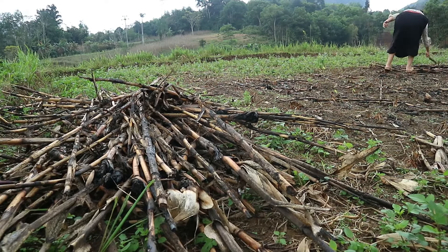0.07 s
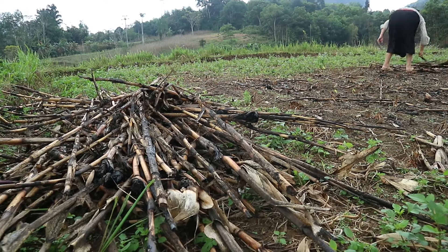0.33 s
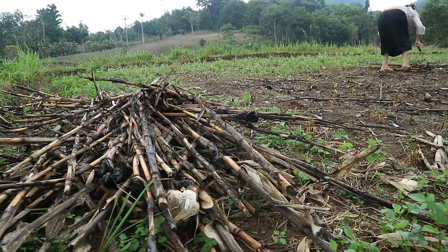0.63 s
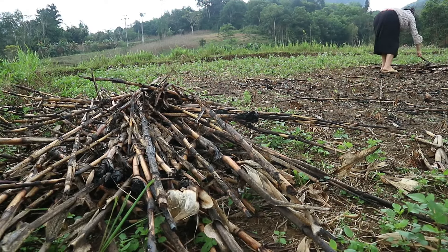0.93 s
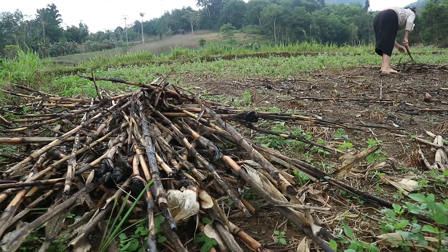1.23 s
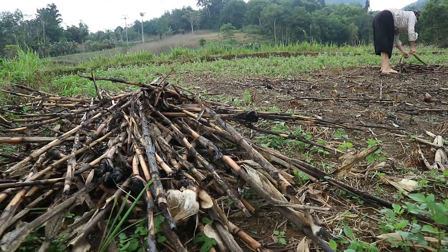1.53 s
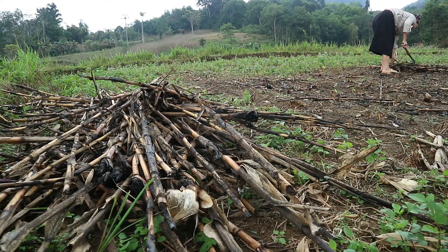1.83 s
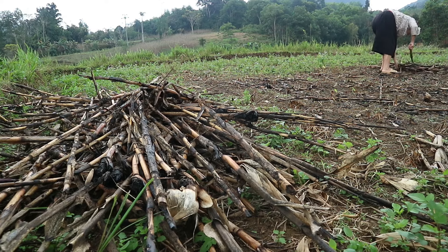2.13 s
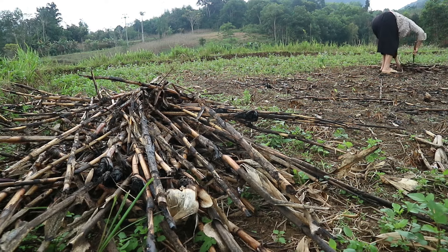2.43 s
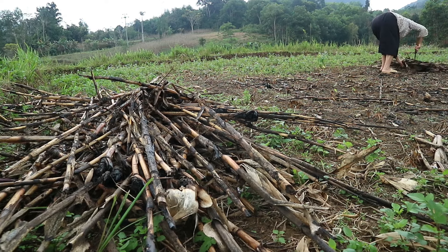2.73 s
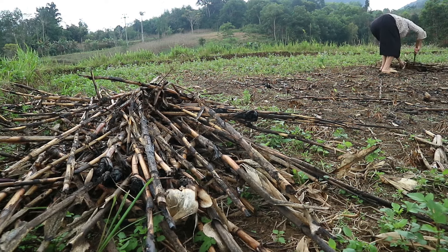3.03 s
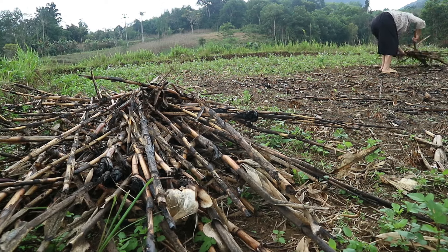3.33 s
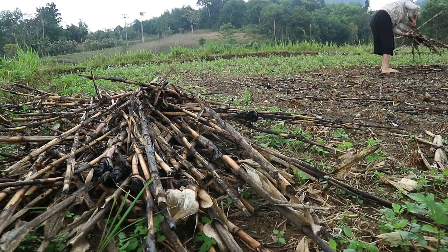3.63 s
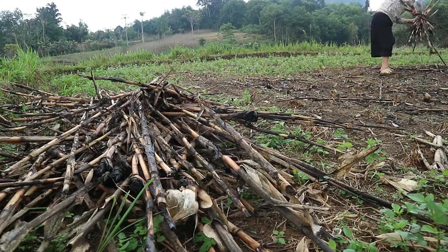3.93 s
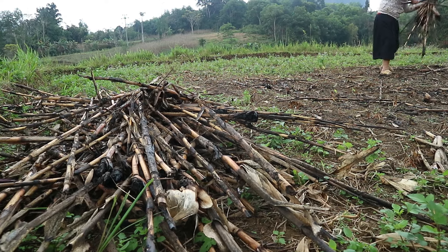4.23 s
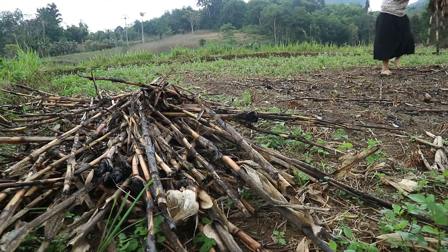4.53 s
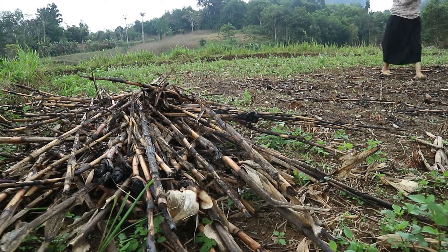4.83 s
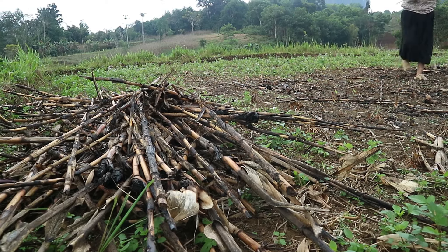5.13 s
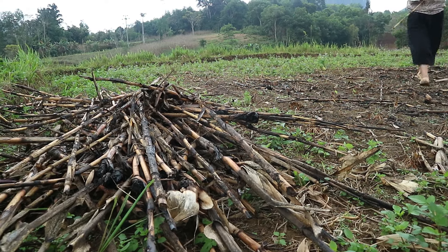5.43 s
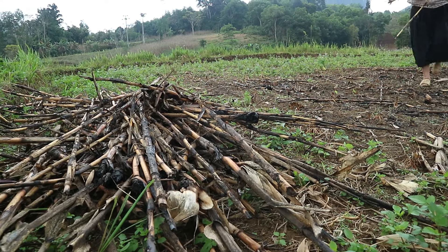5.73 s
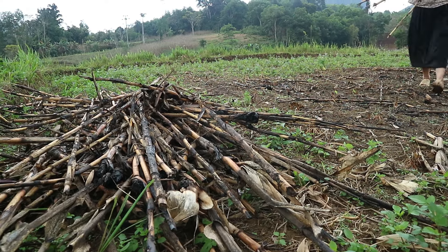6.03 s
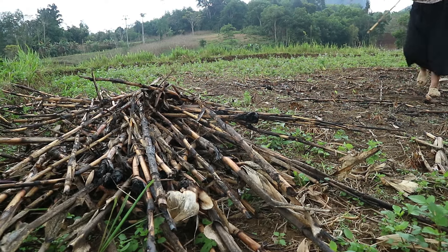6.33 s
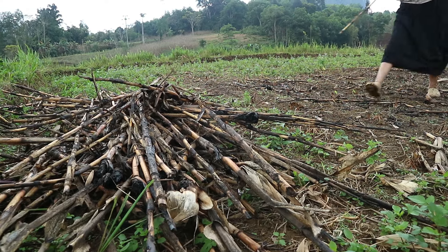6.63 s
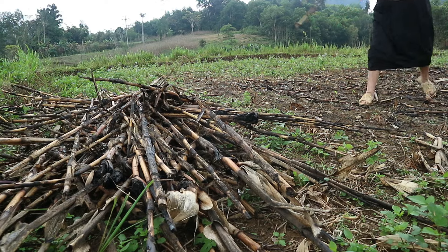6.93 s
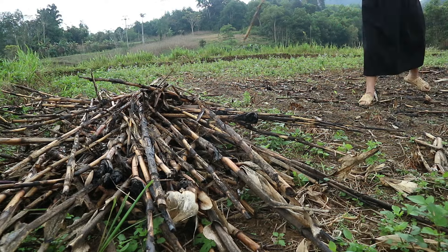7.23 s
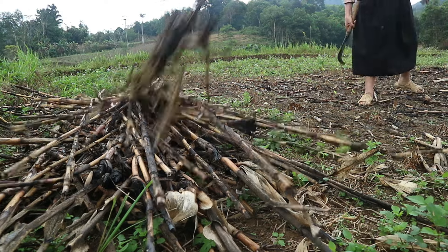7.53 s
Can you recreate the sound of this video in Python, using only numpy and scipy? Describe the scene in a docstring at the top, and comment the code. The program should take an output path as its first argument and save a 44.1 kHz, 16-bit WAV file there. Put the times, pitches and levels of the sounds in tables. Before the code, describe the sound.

In an open field, dry sticks are scraped together over soil a little way off, with soft rustles, small snaps and dull knocks. After a lull, footsteps crackle across stubble and a cane splits underfoot. At the end the armful lands on a pile close to the microphone with a loud, brief wooden clatter. A distant bird repeats two falling notes throughout, over a low outdoor hush and a very faint insect whine.

```python
"""Over an open-air hush, stirring grass and an insect's thin tone, dry sticks scrape across a bare field.
They are raked together, carried over crackling stubble where a cane splits underfoot, and thrown on a
pile close by. Each impact excites a short crack, the bending modes of one stick and a dull knock from
what lies under it. Far off a bird repeats two falling notes, blurred by scattering among trees."""
import sys
import numpy as np
from scipy import signal
from scipy.fft import rfft, irfft, next_fast_len
from scipy.io import wavfile
from scipy.ndimage import uniform_filter1d

SR = 44100
rng = np.random.default_rng(int(sys.argv[2]) if len(sys.argv) > 2 else 0)


def store_pcm(level_fs):
    """Save levels as 16-bit WAV."""
    pcm = np.round(np.clip(level_fs, -1, 1) * 32767).astype(np.int16)
    wavfile.write(sys.argv[1], SR, np.atleast_2d(pcm).T)


N = 342657
TIME = np.arange(N) / SR
SIDES = np.array([[1], [-1]])  # sign of the side signal, left and right
TOP_HZ = 15900

# Spectra (levels are relative throughout). Open-air hush: f/Hz, level/dB
HUSH_SPECTRUM = [(25, -8), (48, 0.5), (75, 1), (145, 3), (200, -4.5), (420, -8), (540, -15), (800, -19),
                 (1300, -25.5), (3700, -29.5), (5000, -32), (10000, -37.5), (12000, -55.5)]
# side relative to mid in the hush: f/Hz, level/dB
HUSH_WIDTH = [(130, -14), (200, 0), (1300, 9), (3000, 3.5), (10000, 6.5)]
# rustling husks: f/Hz, level/dB
HUSK_SPECTRUM = [(600, -23), (1900, 13), (3700, 10.5), (6800, 7), (10000, -5), (12500, -70)]
# scuffed soil: f/Hz, level/dB
SOIL_SPECTRUM = [(70, -4.5), (240, 6.5), (540, 1), (670, -4.5), (860, 2), (1080, -18), (1270, -0.5),
                 (1500, -22), (1900, -6), (3600, -27), (9000, -20.5), (15500, -66)]
# cracking wood: f/Hz, level/dB
CRACK_SPECTRUM = [(200, -2.5), (550, 11), (850, 7), (1100, -2.5), (1800, 7.5), (2350, 4), (3900, 2),
                  (4900, -2.5), (6800, -1), (10000, -12), (15500, -35)]
# knock of what lies under a stick: f/Hz, level/dB
KNOCK_SPECTRUM = [(60, -20), (130, -3.5), (220, 2.5), (350, 4.5), (440, -13.5), (540, -2), (660, -18.5),
                  (860, -2.5), (1150, -28), (2500, -57)]
# treble absorption by the air over the distance: f/Hz, gain/dB
DISTANCE_FILTER = [(9000, -1), (14000, -14)]
# colouring of a crack under the sole: f/Hz, gain/dB
SOLE_FILTER = [(140, 6.5), (280, 0.5), (550, 4.5), (950, -1), (6500, -2)]
# radiation of a thin cane, weak in the bass: f/Hz, gain/dB
CANE_FILTER = [(700, -5.5), (1900, 2), (7000, -1), (13000, 2)]
# tearing cane fibres: f/Hz, level/dB
FIBRE_SPECTRUM = [(500, -2), (1000, 3), (1350, -1), (2000, 11), (2450, -12), (3200, 10), (4500, -9),
                  (8000, -7), (14000, -23)]
# left minus right in the direct sound of the work with the sticks: f/Hz, level/dB
STEREO_BALANCE = [(200, 0), (700, 3), (1300, 13), (1900, -3.5), (4400, -0.5)]

# sweeps that rake, lift, carry and swing the sticks: peak t/s, rise width/s, husk level/dB, soil level/dB
STICK_SWEEPS = [(.01, 0.011, -58, -48), (.505, 0.076, -58.5, -51.5), (1.18, 0.08, -60, -50),
                (1.739, 0.038, -57.5, -51), (2.17, 0.036, -70.5, -60.5), (2.8, 0.11, -66.5, -72),
                (3.48, 0.097, -66, -64.5), (5.045, 0.034, -61.5, -56.5), (5.99, 0.061, -68, -72),
                (6.205, 0.0092, -57.5, -62), (7.17, 0.14, -62, -63)]
# single twigs snapping: t/s, crack level/dB, ring f/Hz
TWIG_SNAPS = [(0.086, -47, 8500), (0.358, -49.5, 5400), (1.059, -46.5, 3420), (1.113, -43, 3860),
              (1.810, -46, 3770), (2.402, -53.5, 3460), (2.648, -55, 1870), (3.322, -50.5, 5800),
              (3.421, -57, 5400), (5.115, -48.5, 3880), (5.247, -49, 2260), (5.951, -59, 7200),
              (6.038, -57.5, 4100), (6.105, -55, 2960), (7.268, -53.5, 4400)]
# heavier sticks striking the ground: t/s, crack level/dB, knock level/dB, ring f/Hz
GROUND_KNOCKS = [(.481, -44, -38.5, 905), (.528, -46.5, -40, 890), (.596, -54, -36.5, 810),
                 (.735, -53, -44.5, 930), (1.143, -48.5, -34, 524), (1.217, -45, -34.5, 620),
                 (1.329, -48, -42.5, 1160), (1.612, -53, -39.5, 880), (1.683, -51, -42, 1800),
                 (2.229, -52, -48, 600), (4.3465, -51, -41, 1930)]
# feet pressing hollow stalks: t/s, crack level/dB, knock level/dB, ring f/Hz
FOOTSTEPS = [(5.0429, -37, -34, 3200), (5.0694, -66, -48, 900), (5.709, -43.5, -40, 750),
             (6.329, -46.5, -37.5, 1310), (6.426, -39, -32, 336), (6.431, -35, -37, 520),
             (6.4544, -40.5, -36, 2000), (6.648, -45.5, -47, 1960), (6.687, -50.5, -50.5, 855)]
# the bird's pairs of notes: t/s, level/dB
CALLS = [(0.23, -52.5), (0.901, -52.5), (1.589, -52.5), (2.266, -52.5), (2.921, -52.5), (3.605, -55.5),
         (4.281, -57), (4.95, -56.5), (5.63, -54), (6.306, -52.5), (7.003, -52)]
# glide of the lower note: t/s from its onset, f/Hz, level/dB
LOW_NOTE = [(0, 3450, -9), (.009, 3250, 3.5), (.022, 3020, 3), (.045, 2800, -4), (.085, 2280, -9)]
# glide of the higher note: t/s from its onset, f/Hz, level/dB
HIGH_NOTE = [(0, 4298, -7), (.011, 4060, 4), (.028, 3580, -1), (.042, 3150, 3.5), (.058, 2890, -4.5),
             (.09, 2600, -7)]
# jerks of the splitting cane: t/s, crack level/dB
CANE_SPLITS = [(6.8149, -40), (6.834, -41), (6.852, -32.5)]
# the armful landing: t/s, crack level/dB, knock level/dB, ring f/Hz, crack T60/s
PILE_IMPACTS = [(7.5194, -42, -39, 1420, 0.11), (7.545, -48, -39, 1810, 0.04),
                (7.561, -54, -25.5, 343, 0.024), (7.5663, -32.5, -30, 5500, 0.031),
                (7.603, -41, -48, 2060, 0.032), (7.611, -35, -39, 900, 0.048),
                (7.6217, -27, -44, 1380, 0.016), (7.628, -25.5, -20.5, 1860, 0.06),
                (7.638, -36, -26, 850, 0.02), (7.654, -22.5, -23.5, 1400, 0.055),
                (7.671, -29.5, -27, 910, 0.023), (7.697, -33, -28, 1950, 0.04),
                (7.7035, -27, -24, 1580, 0.027), (7.711, -27.5, -24.5, 860, 0.11),
                (7.7225, -15.5, -43, 4180, 0.015), (7.727, -26, -29, 2720, 0.013),
                (7.731, -19, -36, 1720, 0.011), (7.744, -48, -22.5, 1770, 0.034)]


def undb(db):
    """Amplitude ratio of a level in decibels."""
    return 10 ** (np.asarray(db) / 20)


def unit(x):
    """Normalisation to rms 1."""
    return x / np.sqrt(np.mean(x ** 2))


def gains(spectrum, size):
    """Interpolation of a spectrum over log frequency, as gains on the bins of a transform."""
    hz, db = np.transpose(spectrum)
    return undb(np.interp(np.log(np.arange(size // 2 + 1) * SR / size + 1), np.log(hz), db))


def tint(x, spectrum):
    """Zero-phase filtering: colour without delay."""
    size = next_fast_len(N)
    return irfft(rfft(x, size) * gains(spectrum, size), size)[..., :N]


def resound(x, spectrum, size=2048):
    """Convolution with the minimum-phase, unit-energy impulse response of a body."""
    cepstrum = irfft(np.log(gains(spectrum, size)))
    cepstrum[1:size // 2] *= 2
    cepstrum[size // 2 + 1:] = 0
    response = irfft(np.exp(rfft(cepstrum)))
    return signal.oaconvolve(x, response / np.linalg.norm(response))[:N]


def fade(t, t60):
    """Exponential damping by 60 dB in t60 seconds."""
    return np.exp(-np.log(1000) * t / t60)


def add(track, start_s, sound):
    """Superposition of a sound on a track."""
    part = track[max(int(start_s * SR), 0):][:len(sound)]
    part += sound[:len(part)]


def wander(rate_hz):
    """Random modulation of rms 1, interpolated between Gaussian values."""
    knots = rng.standard_normal(2048)
    return unit(np.interp(TIME * rate_hz, np.arange(len(knots)), knots))


def air(db, flutter_db):
    """Partially coherent noise: the bass of the hush is alike on both sides, the rest is wide."""
    mid, side = tint(rng.standard_normal((2, N)), HUSH_SPECTRUM)
    hush = (mid + SIDES * tint(side, HUSH_WIDTH)) / np.std(mid)
    return hush * undb(db + flutter_db * wander(6.6))


def grass(db):
    """Modulated band noise: dry grass rustles in brief fits, independent from band to band."""
    rustle = np.zeros((2, N))
    for hz in np.geomspace(500, 4200, 12):
        band = signal.butter(2, [hz / 1.12, hz * 1.12], "bandpass", fs=SR, output="sos")
        fits = unit(undb(4.2 * wander(32)))
        rustle += unit(signal.sosfilt(band, rng.standard_normal((2, N)))) * fits / hz ** .3
    return undb(db) * unit(rustle)


def insect(hz, db):
    """Multipath interference spreads a distant, wavering whine into a narrow band."""
    carrier = np.exp(2j * np.pi * np.cumsum(hz + 11 * wander(40)) / SR)
    paths = np.array([1 + undb(-6) * (wander(160) + 1j * wander(160)) for _ in range(2)])
    return undb(db) * unit(np.real(carrier * paths))


def twigs(per_s, spread_db, lo_hz, hi_hz, ring_cycles, count=40):
    """Modal resonance of many small sticks: each Poisson-timed touch rings up to three modes; rms 1."""
    gaps, sizes, signs, *picks = rng.random((24000, 6)).T
    onsets = (np.cumsum(-np.log(1 - gaps)) / per_s * SR).astype(int)
    force = undb(spread_db * np.minimum(-np.log(1 - sizes), 3.5)) * np.sign(signs - .5)
    picked_modes = (np.array(picks) * count).astype(int)
    modes_hz = np.geomspace(lo_hz, hi_hz, count) * (1 + 0.052 * rng.standard_normal(count))
    ringing = np.zeros(N)
    for k, hz in enumerate(modes_hz):
        touched = (onsets < N) & np.any(picked_modes == k, axis=0)
        drive = np.bincount(onsets[touched], force[touched], N) + 1e-18
        radius = fade(1 / SR, ring_cycles / hz)
        feedback = [1, -2 * radius * np.cos(2 * np.pi * hz / SR), radius ** 2]
        ringing += signal.lfilter([1, 0, -1], feedback, drive) * np.sqrt((1 - radius) * hz)
    return unit(ringing)


def grains(per_s, spread_db):
    """Shot noise: tiny random contacts of very uneven size; rms 1."""
    sizes = undb(spread_db * np.minimum(rng.exponential(size=N), 4))
    return unit((rng.random(N) < per_s / SR) * sizes * rng.choice([-1, 1], N))


def swell(peak_s, rise_s, fall_ratio=1.19, roundness=1.22):
    """Amplitude envelope of one sweep, which falls a little more slowly than it rises."""
    width = np.where(TIME < peak_s, rise_s, rise_s * fall_ratio)
    return np.exp(-(np.abs(TIME - peak_s) / width) ** roundness / 2)


def raking():
    """Friction as many small impacts: dragged sticks rustle the husks and scuff the soil in fits."""
    fits = unit(undb(3 * wander(90)))
    sweeps = np.array([swell(peak_s, rise_s) for peak_s, rise_s, _, _ in STICK_SWEEPS])
    stir, drag = undb(np.array(STICK_SWEEPS)[:, 2:]).T @ sweeps
    husks = twigs(per_s=1300, spread_db=2.6, lo_hz=790, hi_hz=10800, ring_cycles=36)
    clods = grains(per_s=550, spread_db=2.7)
    crackle = unit(resound(husks, HUSK_SPECTRUM)) * stir
    scuffs = resound(clods, SOIL_SPECTRUM) * drag
    return (crackle + scuffs) * fits


def impacts(rows, ring_db, ring_cycles, knock_t60, give_s, size=4096):
    """Impact excitation: a stick yields, cracks, rings in its bending modes and knocks what lies below."""
    t = (np.arange(size) - 256) / SR
    after = np.maximum(t, 0)
    give = np.exp(np.minimum(t, 0) / give_s) * np.where(t < 0, .4, 1)  # fibres crunch before they break
    ratios = (np.array([[3], [5], [7]]) / 3) ** 2  # bending modes of a free bar
    span = np.sqrt(.002 * SR)  # energy of 2 ms at rms 1
    cracks, rings, knocks = np.zeros((3, N))
    for s, crack_db, knock_db, hz, t60 in rows:
        splinters, grind = rng.standard_normal((2, size))
        crack = splinters * give * fade(after, t60)
        knock = grind * give * fade(after, knock_t60)
        knock = knock / np.linalg.norm(knock) + (t == 0)
        modes_hz = hz * ratios
        modes = np.sin(2 * np.pi * modes_hz * after) * fade(after, ring_cycles / modes_hz) / ratios
        ring = np.sum(modes * (modes_hz < 10700), axis=0)  # wood damps higher modes at once
        parts = (cracks, crack, crack_db), (rings, ring, crack_db + ring_db), (knocks, knock, knock_db)
        for track, sound, db in parts:
            add(track, s + t[0], span * undb(db) * sound / np.linalg.norm(sound))
    return resound(cracks, CRACK_SPECTRUM) + rings + resound(knocks, KNOCK_SPECTRUM)


def crack_t60(ring_hz):
    """Power-law scaling of decay time: thinner sticks ring higher and crack more briefly."""
    return 0.034 * (2000 / ring_hz) ** 0.066


def stubble():
    """Absorption by the air over the distance dulls snapping twigs, knocking sticks and hollow stalks pressed
    underfoot."""
    snap_rows = [(s, db, db - 18, hz, crack_t60(hz)) for s, db, hz in TWIG_SNAPS]  # light: little knock
    knock_rows = [(*row, crack_t60(row[-1])) for row in GROUND_KNOCKS]
    step_rows = [(*row, crack_t60(row[-1])) for row in FOOTSTEPS]
    steps = impacts(step_rows, ring_db=-2, ring_cycles=18, knock_t60=0.024, give_s=0.002)
    snaps = impacts(snap_rows, ring_db=1.5, ring_cycles=17, knock_t60=0.023, give_s=0.0038)
    knocks = impacts(knock_rows, ring_db=-0.5, ring_cycles=26, knock_t60=0.083, give_s=0.0047)
    return tint(snaps + knocks + tint(steps, SOLE_FILTER), DISTANCE_FILTER)


def whistle(glide):
    """Frequency modulation: one falling pure tone, slightly detuned at random."""
    s, hz, db = np.transpose(glide)
    t = np.arange(int(s[-1] * SR)) / SR
    pitch = np.interp(t, s, hz) * (1 + 0.0089 * rng.standard_normal())
    return np.sin(2 * np.pi * np.cumsum(pitch) / SR) * undb(np.interp(t, s, db))


def bird(high_after_s=.215):
    """Scattering by trees at the field's edge blurs two alternating notes that waver on their way."""
    song = np.zeros(N)
    for s, db in CALLS:
        add(song, s, undb(db) * whistle(LOW_NOTE))
        add(song, s + high_after_s, undb(db) * whistle(HIGH_NOTE))
    song *= unit(undb(1.7 * wander(140)))
    trees = np.array([scatter(song, t60=.07) + undb(-4) * scatter(song, t60=.3) for _ in range(2)])
    return undb(-8.5) * song + undb(-5.8) * trees


def cane(ring_hz=2060, jerk_t60=0.019, tear_s=0.062):
    """Stepwise fracture: a cane splits underfoot in jerks, and its fibres keep tearing between them."""
    rows = [(s, db, db - 5, ring_hz, jerk_t60) for s, db in CANE_SPLITS]
    jerks = impacts(rows, ring_db=-5, ring_cycles=28, knock_t60=0.022, give_s=0.0023)
    progress = np.clip((TIME - CANE_SPLITS[0][0]) / tear_s, 0, 1)
    pressure = np.sqrt(4 * progress * (1 - progress))
    tearing = resound(grains(per_s=810, spread_db=3), FIBRE_SPECTRUM)
    return tint(jerks, CANE_FILTER) + undb(-47) * pressure * tearing


def settling(start_s=7.563, attack_s=0.067, hold_s=0.093, rise_db_per_s=202, fall_db_per_s=170):
    """Envelope of the pile's rattle: exponential growth, a plateau and exponential decay."""
    t = TIME - start_s
    rise = rise_db_per_s * np.minimum(t - attack_s, 0)
    fall = fall_db_per_s * np.maximum(t - attack_s - hold_s, 0)
    return undb(rise - fall) * (t > 0)


def landing():
    """Inelastic collisions: thick sticks strike the pile in turn, thin ones crunch and the heap thuds."""
    thin_sticks = twigs(per_s=1100, spread_db=3, lo_hz=480, hi_hz=9500, ring_cycles=50)
    clatter = undb(-7.5) * unit(resound(thin_sticks, CRACK_SPECTRUM))
    fractures = grains(per_s=2600, spread_db=3.5)
    splinters = undb(-10) * resound(fractures, [(1000, 13), (5500, 1), (15000, -5)])
    heap = undb(-9.5) * resound(grains(per_s=1400, spread_db=1), KNOCK_SPECTRUM)
    blows = impacts(PILE_IMPACTS, ring_db=-6, ring_cycles=24, knock_t60=0.024, give_s=0.002)
    return undb(-30.5) * settling() * (clatter + splinters + heap) + blows


def scatter(x, t60, size=16384):
    """Diffuse reflection smears a sound in time and keeps its colour."""
    tail = rfft(rng.standard_normal(size) * fade(np.arange(size) / SR, t60))
    whitened = tail / np.sqrt(uniform_filter1d(np.abs(tail) ** 2, size=60))
    return signal.oaconvolve(x, irfft(whitened))[:N]


def ground_bounce(x, echo_db, lag_s=0.00108):
    """Comb filtering: the reflection off the soil interferes with the direct sound."""
    size = next_fast_len(N + 256)
    hz = np.arange(size // 2 + 1) * SR / size
    echo = undb(echo_db)
    comb = (1 + echo * np.exp(-2j * np.pi * hz * lag_s)) / np.hypot(1, echo)
    return irfft(rfft(x, size) * comb, size)[..., :N]


def spread(x, side_db, side_t60, field_db):
    """Nearby wood and soil scatter the shorter waves sideways; the field returns a faint tail."""
    direct = np.array([tint(x, [(hz, sign * db / 2) for hz, db in STEREO_BALANCE]) for sign in (1, -1)])
    delayed = np.pad(x, (int(.004 * SR), 0))[:N]
    side = tint(scatter(delayed, side_t60), [(200, -46), (1200, 0)])
    tail = np.array([scatter(delayed, t60=0.18) for _ in range(2)])
    return direct + SIDES * undb(side_db) * side + undb(field_db) * tail


def scene():
    """Superposition of the work with the sticks and the steady life of the field."""
    gathering = ground_bounce(raking() + stubble() + cane(), echo_db=-10.5)
    far = spread(gathering, side_db=-10, side_t60=0.0093, field_db=-6)
    near = spread(landing(), side_db=-6.5, side_t60=0.0092, field_db=-14)
    return far + near + grass(db=-62) + bird() + insect(hz=2720, db=-70) + air(db=-53, flutter_db=1.2)


def record(dry):
    """Band limiting removes the deepest rumble and the highest treble."""
    dry = signal.sosfilt(signal.butter(2, 35, "highpass", fs=SR, output="sos"), dry)
    return signal.sosfilt(signal.ellip(8, .2, 70, TOP_HZ, fs=SR, output="sos"), dry)


dry = scene()
out = record(dry)
store_pcm(out)
```